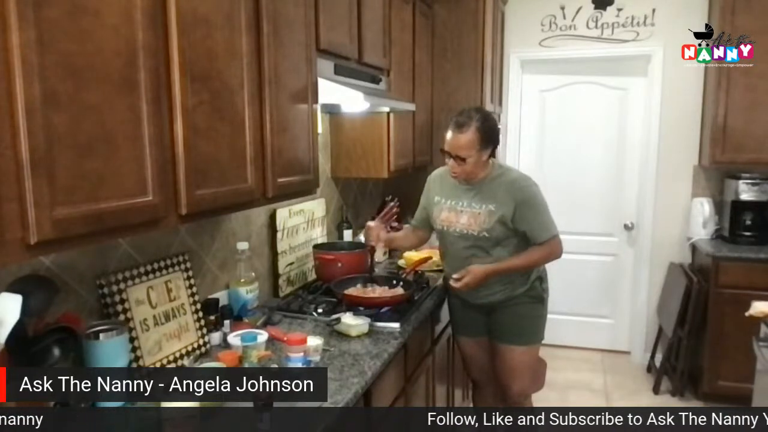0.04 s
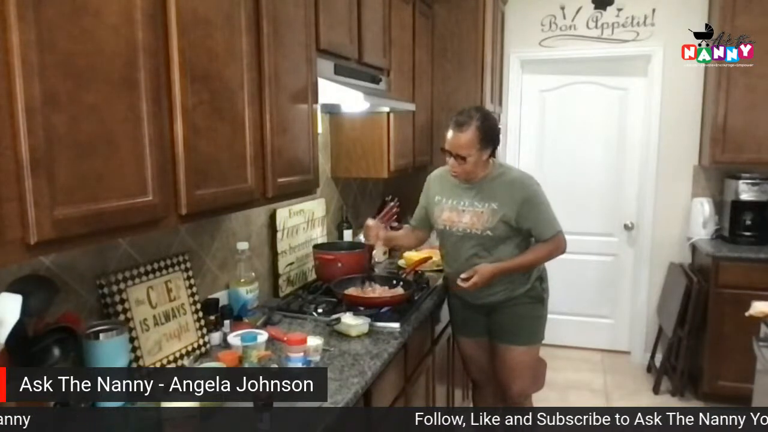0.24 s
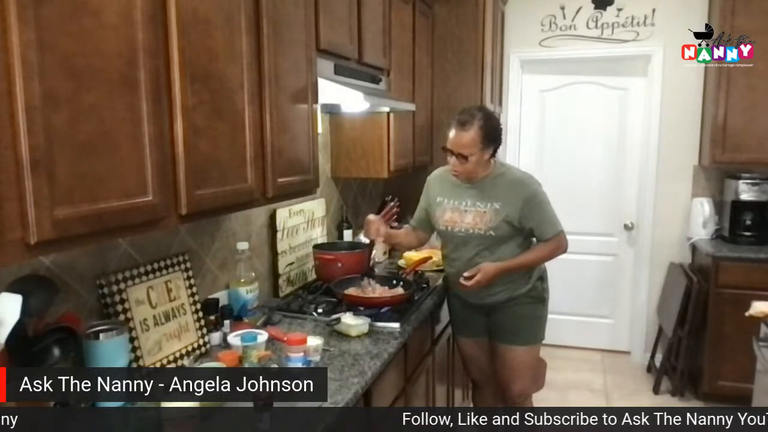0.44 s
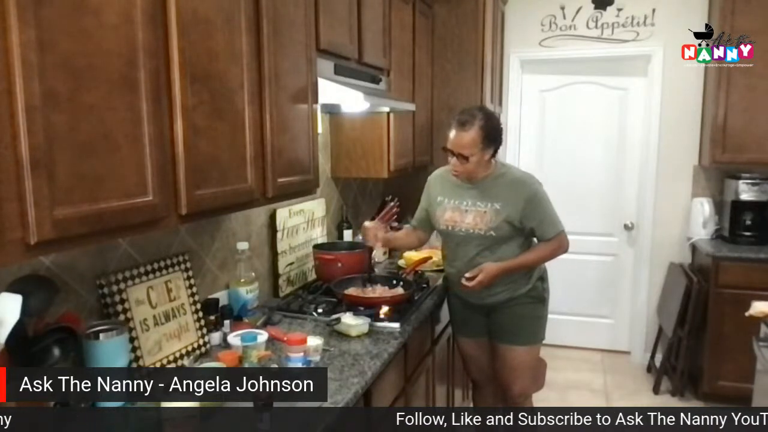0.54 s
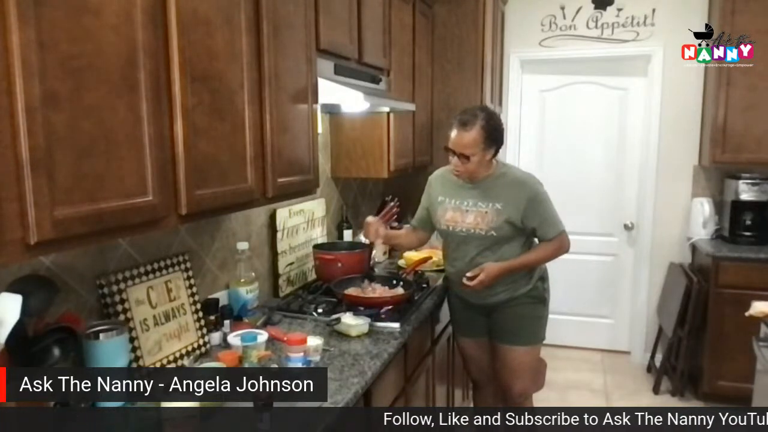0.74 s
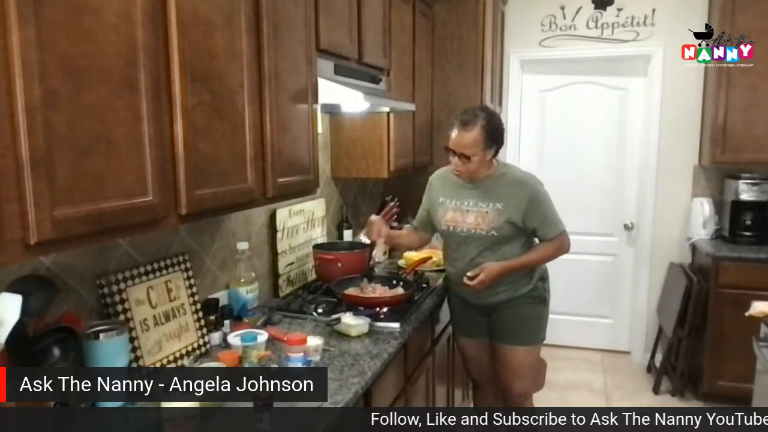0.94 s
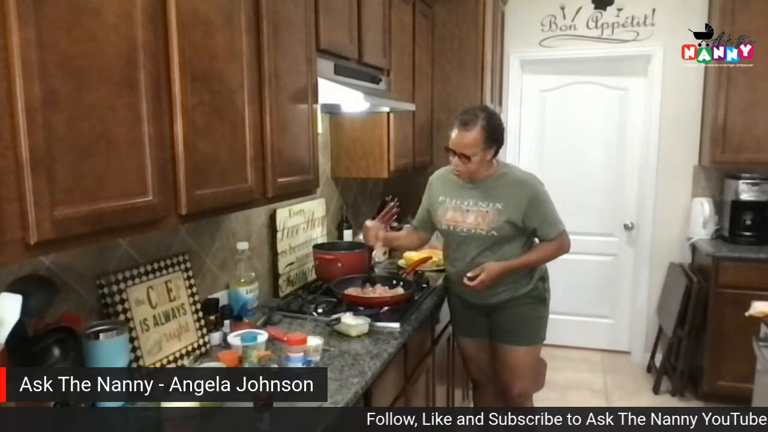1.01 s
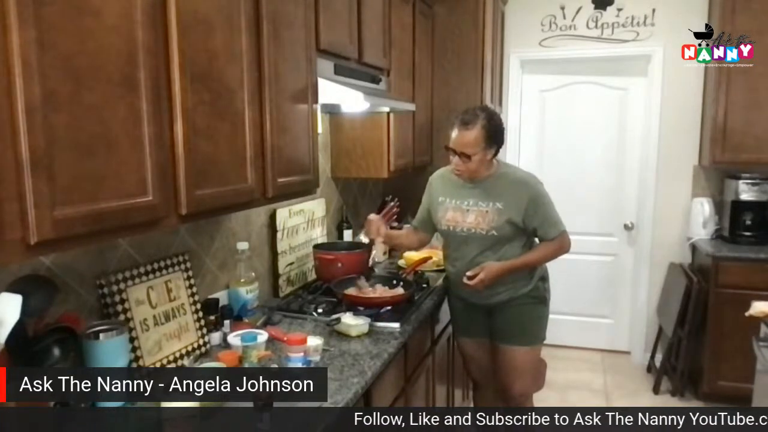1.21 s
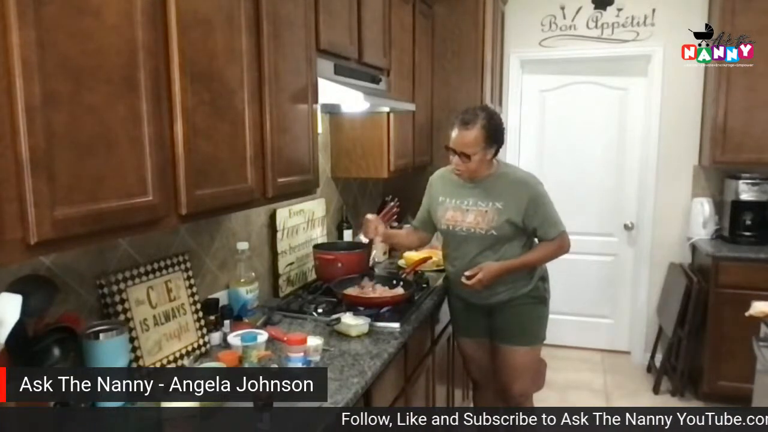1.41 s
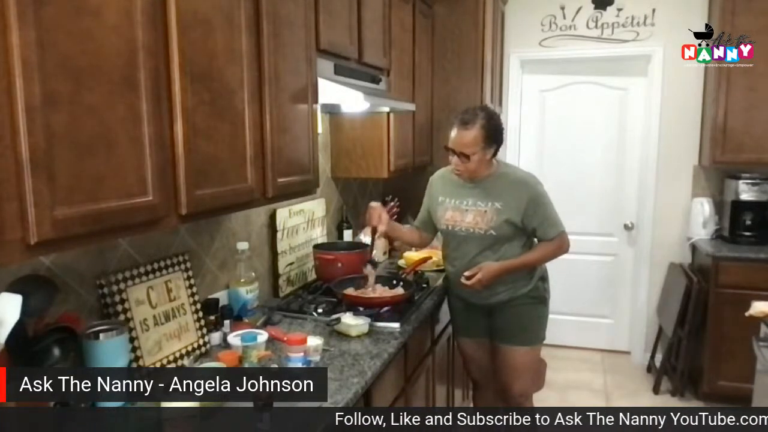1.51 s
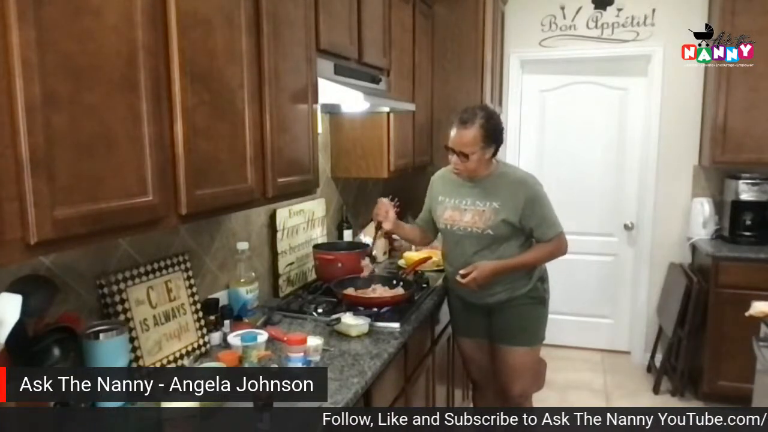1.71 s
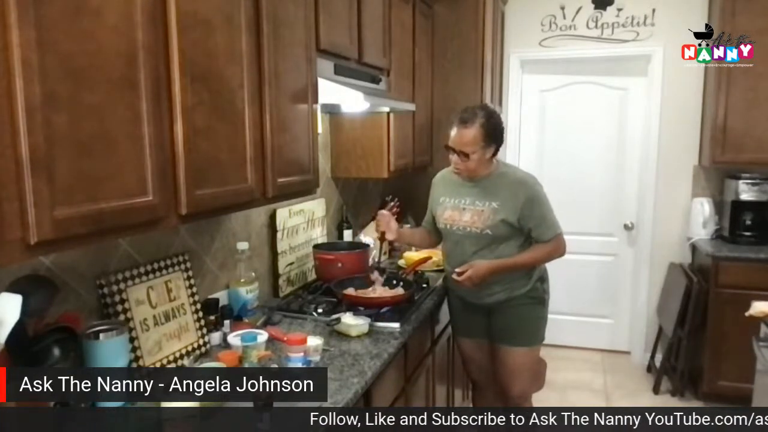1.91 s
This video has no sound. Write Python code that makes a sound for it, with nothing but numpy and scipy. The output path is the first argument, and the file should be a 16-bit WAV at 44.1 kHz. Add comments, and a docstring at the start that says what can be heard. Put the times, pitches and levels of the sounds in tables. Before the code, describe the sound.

Quick metallic knocks of a hand masher squashing wet meat in a faintly sizzling pan.

```python
"""Close to the stove in a small kitchen, one microphone. Ground meat sizzles faintly in a metal skillet.
From 0.2 s a hand masher strikes nine times, about six strikes a second. Each time the blades sink in,
knock the pan and squash the meat; the pan chatters on its grate, the stove top booms, the room answers.
Near 1.7 s the pan shifts a little on the grate and the sizzle is left. Whenever it gets quiet,
the recorder turns the bass and middle down."""
import sys
import numpy as np
from scipy import signal
from scipy.fft import rfft, irfft, next_fast_len
from scipy.io import wavfile
from scipy.ndimage import uniform_filter1d, map_coordinates

SR = 44100
rng = np.random.default_rng(int(sys.argv[2]) if len(sys.argv) > 2 else 0)


def waveform_to_disk(signal):
    """Save audio, clipped to [-1, 1], as 16-bit WAV at the path in sys.argv[1]."""
    frames = np.transpose(np.atleast_2d(signal))
    scaled = np.clip(frames, -1, 1) * 32767
    samples = np.round(scaled).astype(np.int16)
    wavfile.write(sys.argv[1], SR, samples)


N = 85995
T = np.arange(int(.8 * SR)) / SR  # seconds within one event

# The masher's blows. Each row: start in seconds, knock gain in dB, treble shelf in dB, pitch of the
# struck spot in Hz, squelch gain in dB, squelch hold in seconds, chatter delay in seconds,
# chatter gain in dB, boom gain in dB.
BLOWS = [(0.2, 0.5, -1, 1060, 1.5, 0.036, 0.041, -1.5, -0.5),
         (0.367, -1, 0.5, 690, 2.5, 0.067, 0.034, 0.5, -11.5),
         (0.526, 1.5, -7.5, 1535, 5, 0.05, 0.033, -0.5, 1), (0.677, 2, 4.5, 580, 0.5, 0.06, .040, 0.5, 2),
         (0.83, 1, -2, 825, -0.5, 0.071, 0.039, 0, 2), (0.992, 1, -2, 550, -1, 0.069, .032, -0.5, -0.5),
         (1.139, 2.5, -5.5, 1108, 2.5, 0.058, .045, 0, 0),
         (1.290, 2, -2.5, 1190, 2.5, 0.073, 0.037, 1.5, 2), (1.447, 1.5, -5.5, 667, 4, 0.038, 0.032, 1, -1)]
# Modes of the skillet on its grate and of the stove top. Each row: frequency in Hz, relative level in dB.
PAN_MODES = [(267, 7.5), (310, 4.5), (401, 6), (447, 6.5), (555, -6.5), (620, 0), (707, 6.5), (845, -2.5),
             (923, -14), (1098, 0), (1130, 2), (1238, -17), (1320, -31.5), (1577, 3.5)]
STOVE_MODES = [(50, -28.5), (65, -19), (106, -10.5), (114, -11), (148, -10), (163, -11), (185, -13.5)]
# Short-lived resonances of the steel that colour every contact, and thin whistles in the sizzle.
# Each row: centre in Hz, width in Hz, lift in dB.
STEEL_PEAKS = [(1745, 150, 2), (2175, 60, 6), (2860, 200, 4), (3200, 80, 5), (3980, 55, 7), (4410, 90, 9),
               (4920, 80, 5), (5140, 110, 6), (5590, 170, 9), (6820, 220, 9), (8600, 220, 7),
               (10460, 90, 8), (11110, 75, 10), (11890, 140, 6)]
WHISTLE_PEAKS = [(3600, 71, 16), (5340, 180, 6)]
# Each source's noise colour at the microphone. Each row: frequency in Hz, relative level in dB.
KNOCK_SPECTRUM = [(25, -55), (90, -40), (350, -18), (580, 1.5), (1100, -2), (1700, -1.5), (2350, -10.5),
                  (3100, -9), (5500, -21.5), (8000, -36), (16000, -54)]
SQUELCH_SPECTRUM = [(500, -20), (2500, 5.5), (5000, 2), (6800, -1.5), (7700, -4), (10000, -2.5),
                    (12500, -10.5), (16000, -8)]
CHATTER_SPECTRUM = [(25, -32.5), (60, -2), (150, -10), (280, 3.5), (700, -2.5), (1600, -4.5), (2400, -15.5),
                    (4500, -19), (8000, -32.5), (16000, -68)]
SCRAPE_SPECTRUM = [(60, -18), (220, -14), (330, 1), (410, 6), (530, -2), (700, 5), (1200, -4), (1900, -15),
                   (3000, -36), (16000, -56)]
SIZZLE_SPECTRUM = [(25, -5.5), (130, 6), (350, -1.5), (1000, -4), (2200, -3), (3700, -10.5), (5500, -10.5),
                   (7500, -16), (10500, -13), (16000, -18.5)]
# The stirred meat fries a little harder. Each row: time in seconds, level in dB.
SIZZLE_LEVELS = [(.1, -49), (1.849, -46)]
# The kitchen's reverberation. Each row: frequency in Hz, time to fall 60 dB in seconds.
KITCHEN_DECAY = [(100, 0.58), (400, 0.61), (1300, 0.81), (3000, 0.69), (6000, 0.71), (15000, 0.41)]

CONTACT_RISE_S, PAN_RISE_S, PAN_T60_S = 0.0028, 0.0017, 0.31


def knock(treble_db, spot_hz):
    """The blades reach the pan: a steely clack pitched by where they land, with the pan ringing on."""
    peaks = list(STEEL_PEAKS) + [(spot_hz, 70, 10)]  # the spot: 70 Hz wide, lifted 10 dB
    clack = noise(KNOCK_SPECTRUM, peaks, treble_db) * fade(CONTACT_RISE_S, t60_s=0.18)
    pan = ring(PAN_MODES, swell_cycles=3.1) * fade(CONTACT_RISE_S, PAN_T60_S)
    return amp(-6.5) * clack + amp(-14.5) * pan


def sink_in(length_s):
    """A soft squish that grows as the blades sink through the meat towards the pan."""
    level_db = -38 + 26.5 * np.minimum(T / length_s - 1, 0)
    return noise(KNOCK_SPECTRUM, STEEL_PEAKS, treble_db=10) * amp(level_db) * (T < length_s)


def squelch(hold_s):
    """Wet meat crackles and spits while the blades press through it."""
    crackle = grainy(SQUELCH_SPECTRUM, grains_per_s=700)
    return amp(-24.5) * crackle * fade(rise_s=0.003, t60_s=0.13, hold_s=hold_s)


def chatter(gap_s=0.013, loss_db=2):
    """The pan rocks on the grate in three dull, weakening contacts that ring it again."""
    out = amp(-19.5) * ring(PAN_MODES) * fade(PAN_RISE_S, PAN_T60_S)
    for k in range(3):
        contact = noise(CHATTER_SPECTRUM, STEEL_PEAKS) * fade(CONTACT_RISE_S, t60_s=0.24)
        start_s = gap_s * (k + rng.uniform(-.25, .25))
        add(out, start_s, amp(-12.5 - loss_db * k) * contact)
    return out


def stove_boom(swell_s=0.032):
    """Under the pan, the stove top swings up with the push and dies away."""
    swell = np.minimum(T / swell_s, 1)
    return amp(-21.5) * ring(STOVE_MODES) * swell * fade(PAN_RISE_S, t60_s=0.43, hold_s=swell_s)


def pan_scrape():
    """The pan slides briefly over the grate and stops."""
    friction = grainy(SCRAPE_SPECTRUM, grains_per_s=305)
    return amp(-31.5) * friction * fade(rise_s=0.018, t60_s=0.045, hold_s=0.046)


def near_walls(x, echoes=6, spread_s=0.01):
    """Tiles and cupboards beside the stove send a few quick copies to the microphone."""
    out, gain = x.copy(), amp(-2.5)
    for when, polarity in rng.random((echoes, 2)):
        echo = np.sign(polarity - .5) * gain / np.sqrt(echoes) * x
        add(out, spread_s * (.15 + when), echo)
    return out / np.sqrt(1 + gain ** 2)


def kitchen(x, delay_s=0.006):
    """The direct sound, then the answer of the room behind it, whose top treble dies first."""
    hz, t, bands = signal.stft(rng.standard_normal(len(T)), SR, nperseg=256)
    decay = amp(-60 * t / along(KITCHEN_DECAY, hz)[:, None])
    tail = signal.istft(bands * decay, SR, nperseg=256)[1]
    reverb = signal.fftconvolve(x, tail / np.linalg.norm(tail))
    out = x.copy()
    add(out, delay_s, amp(-6.5) * reverb)
    return out


def sizzle():
    """Faint frying and room air, behind everything else."""
    level_db = np.interp(np.arange(N) / SR, *np.transpose(SIZZLE_LEVELS))
    return noise(SIZZLE_SPECTRUM, WHISTLE_PEAKS, size=N) * amp(level_db)


def ring(modes, swell_cycles=1, scatter_db=0.5, detune=0.007):
    """Metal modes, weighted and slightly detuned anew by each contact; low ones build up slowest."""
    hz, db = np.transpose(modes)
    gain = amp(db + scatter_db * rng.standard_normal(len(hz)))
    detuned_hz = hz * (1 + detune * rng.standard_normal(len(hz)))
    cycles = detuned_hz[:, None] * T
    waves = np.sin(2 * np.pi * (cycles + rng.random((len(hz), 1))))
    swell = 1 - np.exp(-cycles / swell_cycles)
    return np.sqrt(2) * gain @ (waves * swell) / np.linalg.norm(gain)


def grainy(spectrum, grains_per_s, scatter_db=1.5):
    """Noise broken into tiny bursts of random size, coloured by the steel."""
    sizes_db = scatter_db * map_coordinates(rng.standard_normal(len(T)), [T * grains_per_s], order=1)
    sizes = amp(sizes_db)
    return sizes / np.sqrt(np.mean(sizes ** 2)) * noise(spectrum, STEEL_PEAKS)


def noise(spectrum, peaks, treble_db=0, shelf_hz=2250, size=len(T)):
    """Coloured noise with resonant peaks, at rms 1 ahead of its treble shelf."""
    hz = np.fft.rfftfreq(size, 1 / SR)
    lift_db = sum(db / (1 + (2 * (hz - centre) / width) ** 2) for centre, width, db in peaks)
    coloured = rfft(rng.standard_normal(size)) * amp(along(spectrum, hz) + lift_db)
    shelf = amp(treble_db * hz ** 2 / (hz ** 2 + shelf_hz ** 2))
    return irfft(coloured * shelf, size) / np.std(irfft(coloured, size))


def fade(rise_s, t60_s, hold_s=0):
    """Attack, hold and exponential release."""
    return (1 - np.exp(-T / rise_s)) * amp(-60 * np.maximum(T - hold_s, 0) / t60_s)


def along(points, hz):
    """Interpolate (Hz, value) points on a log frequency axis."""
    point_hz, values = np.transpose(points)
    return np.interp(np.log(hz + 1), np.log(point_hz + 1), values)


def amp(db):
    """Decibels to gain."""
    return 10 ** (np.asarray(db) / 20)


def add(out, start_s, x):
    """Mix x into out from start_s on."""
    part = out[max(round(start_s * SR), 0):][:len(x)]
    part += x[:len(part)]


def noise_gate(x, threshold_db=-30.5, knee_db=3.5, depth_db=8, window_s=0.011, top_hz=5500):
    """The recorder's noise suppression turns bass and middle down whenever the sound is quiet."""
    power = np.abs(uniform_filter1d(x ** 2, round(window_s * SR)))
    level_db = 10 * np.log10(power + 1e-12)
    closed = np.clip((threshold_db - level_db) / knee_db, 0, 1)
    low = signal.sosfiltfilt(signal.butter(2, top_hz, fs=SR, output="sos"), x)
    return x + low * (amp(-depth_db * closed) - 1)


def scene(sink_s=0.059):
    """What reaches the microphone: the blows and the settling pan in the kitchen, over the sizzle."""
    out = sizzle()
    for start_s, knock_db, treble_db, spot_hz, squelch_db, hold_s, delay_s, chatter_db, boom_db in BLOWS:
        blow = amp(knock_db) * knock(treble_db, spot_hz)
        blow += amp(squelch_db) * near_walls(squelch(hold_s))
        add(blow, delay_s, amp(chatter_db) * chatter())
        add(out, start_s - sink_s, sink_in(sink_s))
        add(out, start_s, kitchen(blow) + amp(boom_db) * stove_boom())
    add(out, 1.4, amp(-5.5) * stove_boom())  # the stove top springs back
    add(out, 1.697, kitchen(pan_scrape()))
    return out[None]


def record(dry):
    """The recorder turns quiet moments down, rounds off the highest peaks and cuts the top treble."""
    ceiling, top_hz = 0.97, 15850
    gated = noise_gate(dry)
    rounded = gated / (1 + np.abs(gated / ceiling) ** 6) ** (1 / 6)
    size = next_fast_len(N + SR // 2)
    in_band = np.fft.rfftfreq(size, 1 / SR) < top_hz
    return irfft(rfft(rounded, size) * in_band, size)[..., :N]


dry = scene()
out = record(dry)
waveform_to_disk(out)
```